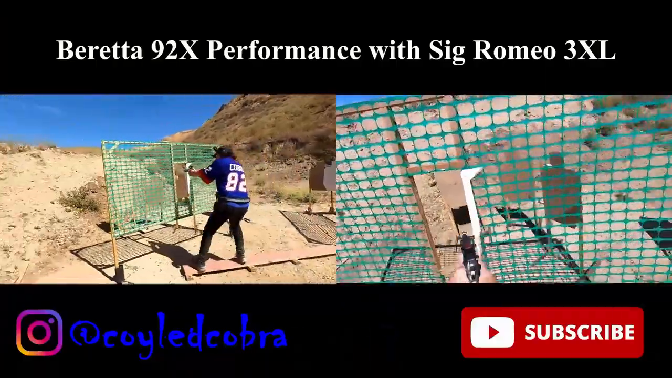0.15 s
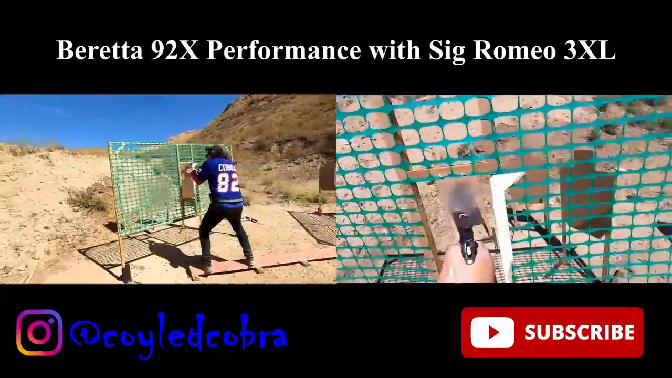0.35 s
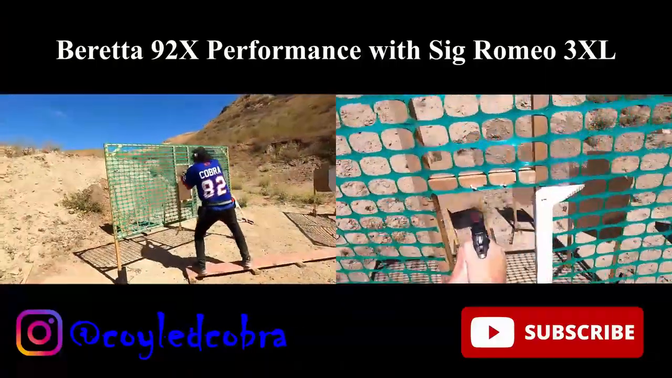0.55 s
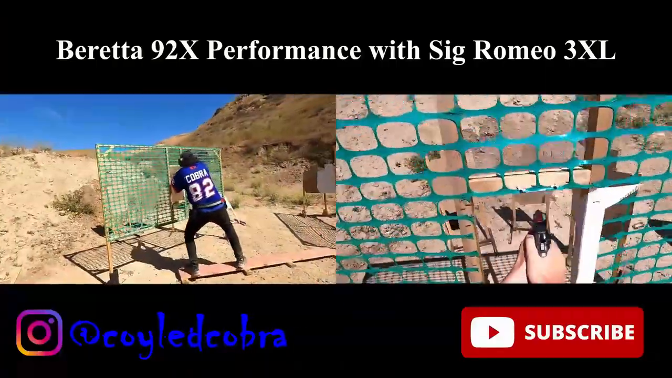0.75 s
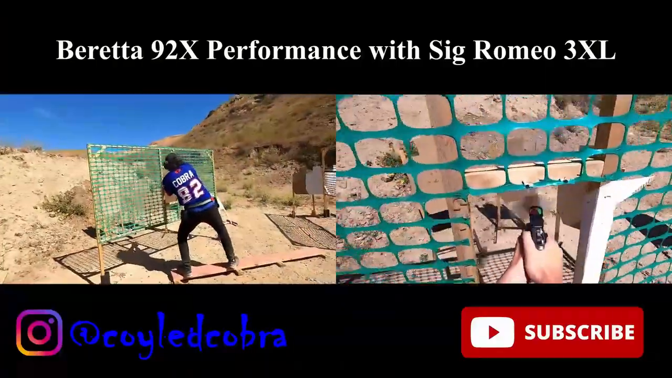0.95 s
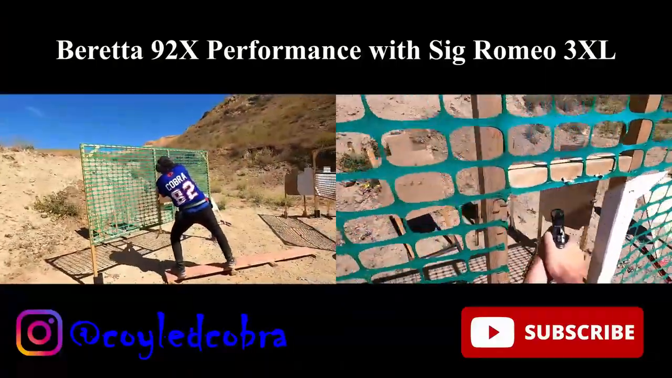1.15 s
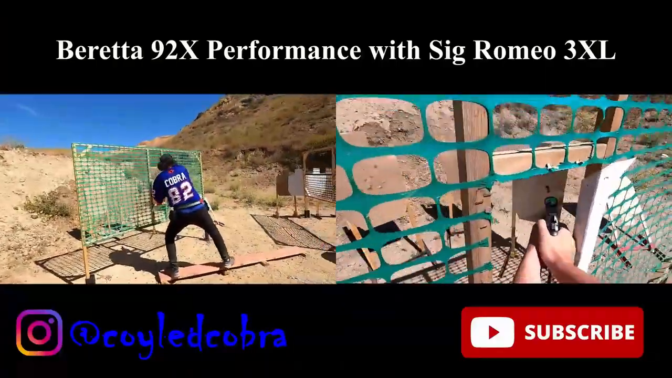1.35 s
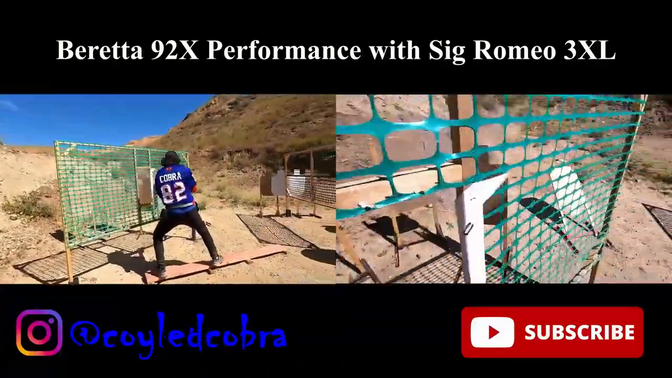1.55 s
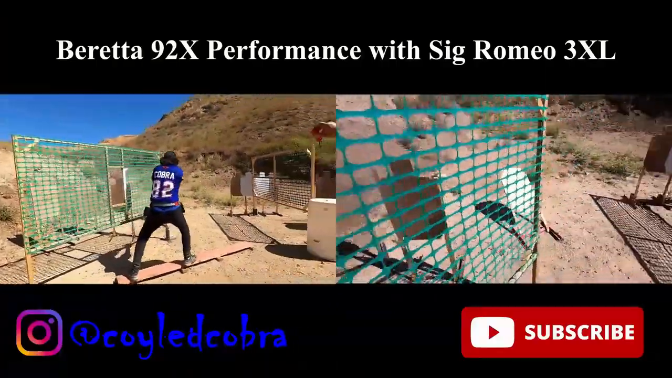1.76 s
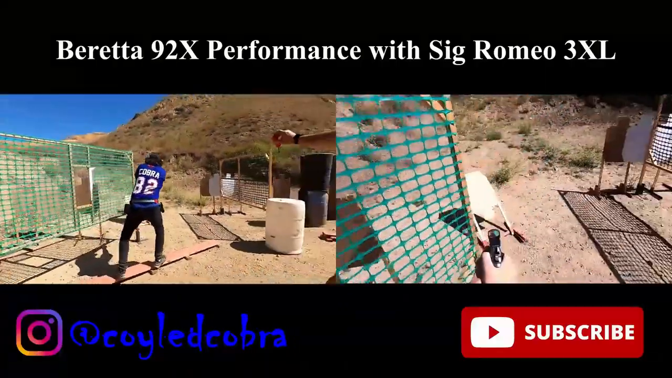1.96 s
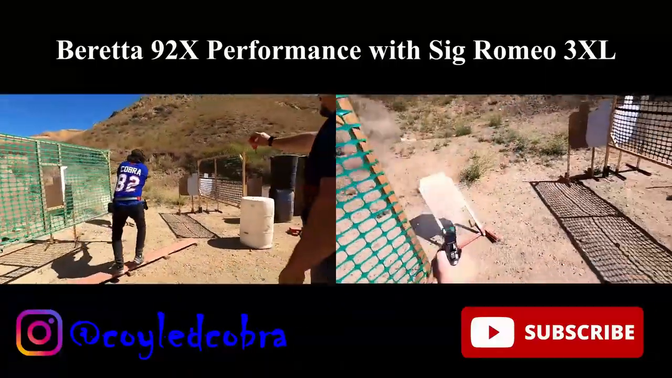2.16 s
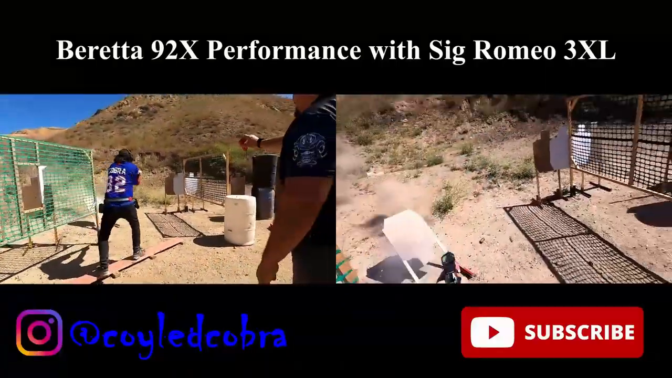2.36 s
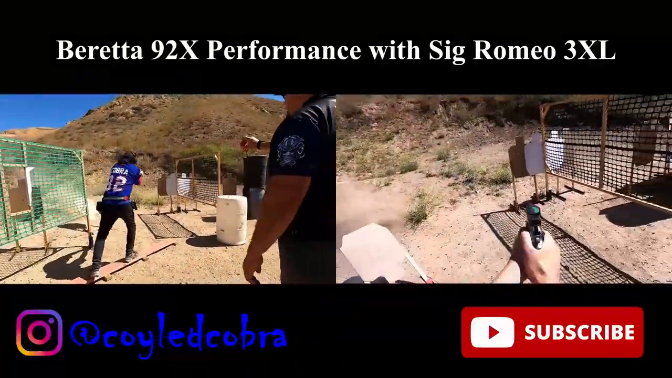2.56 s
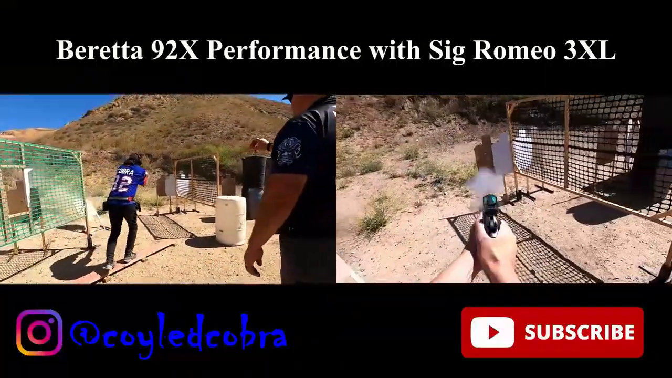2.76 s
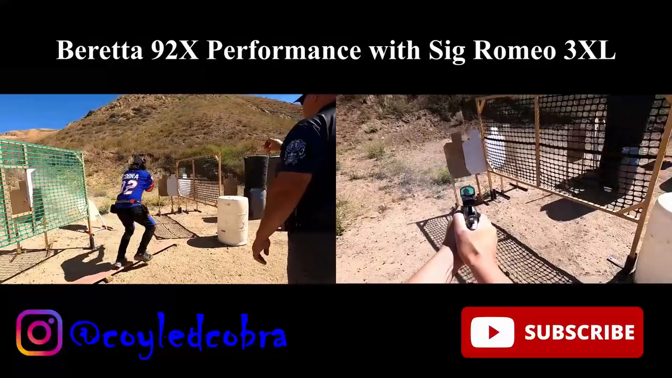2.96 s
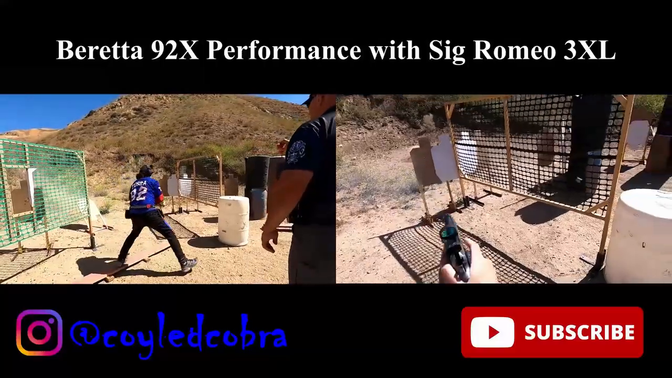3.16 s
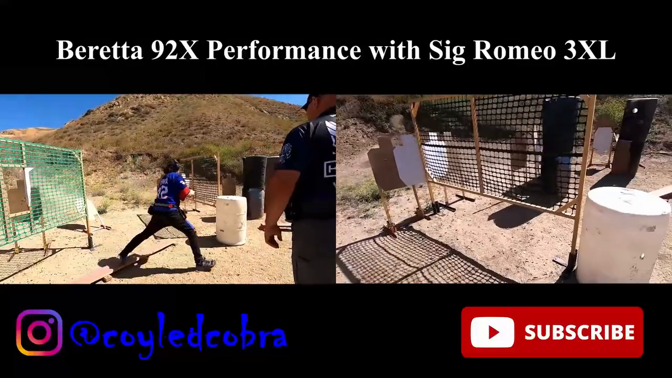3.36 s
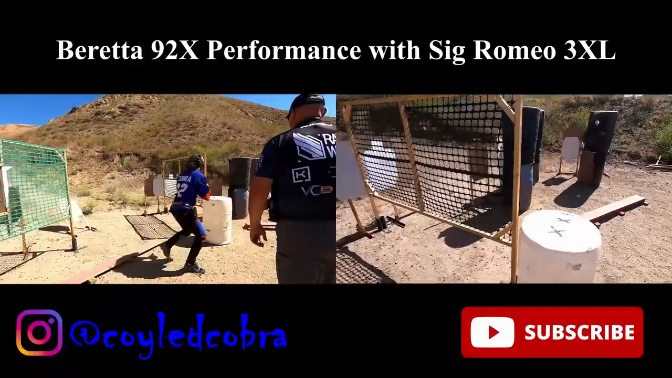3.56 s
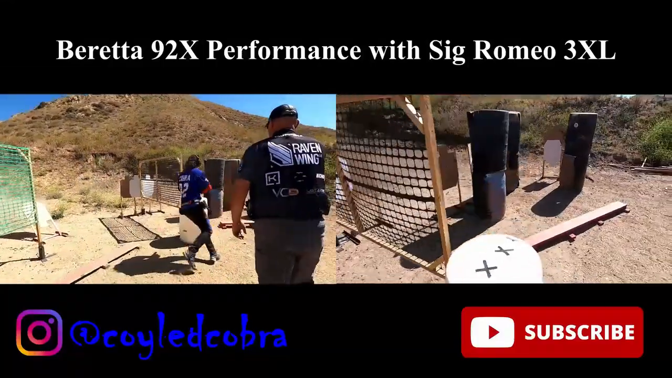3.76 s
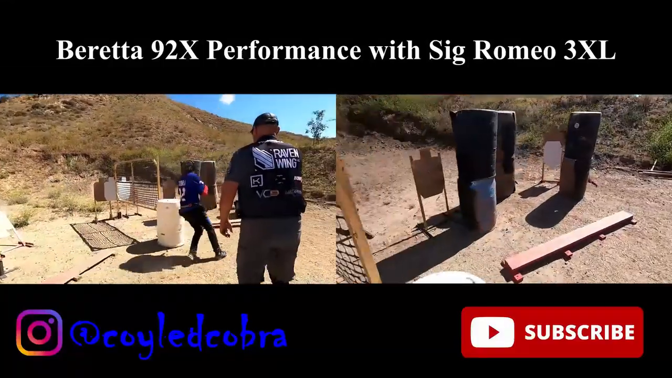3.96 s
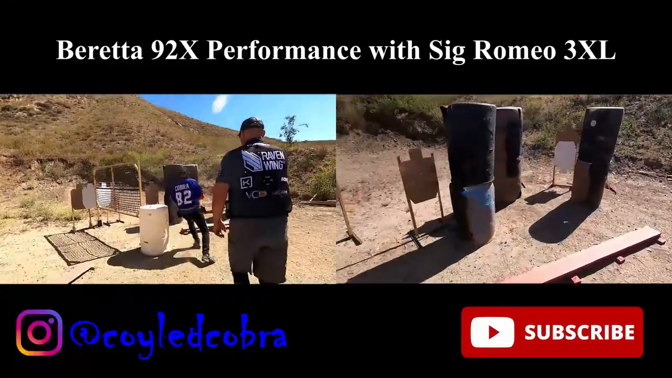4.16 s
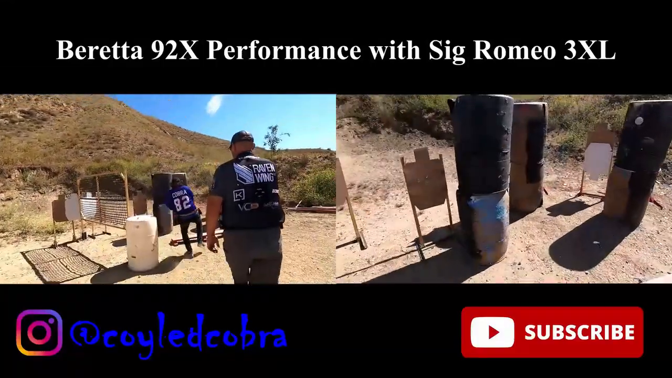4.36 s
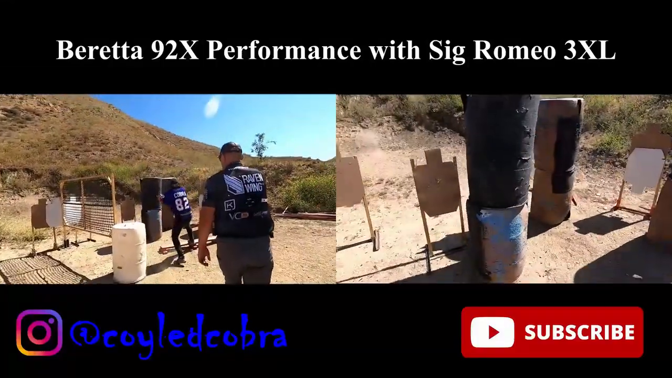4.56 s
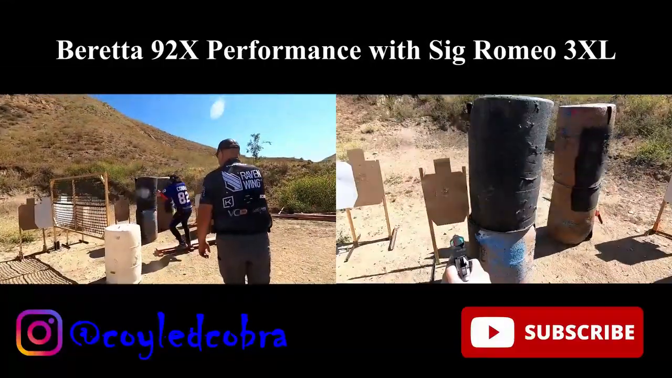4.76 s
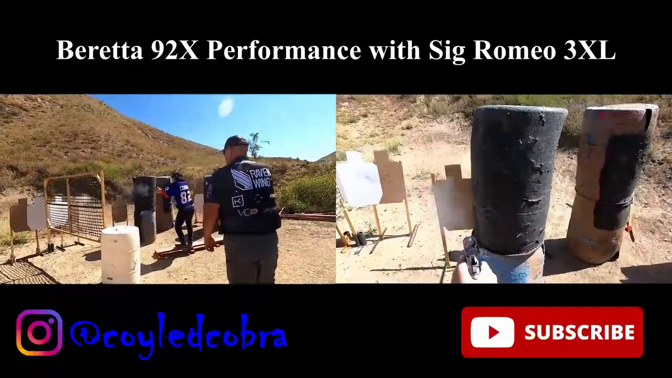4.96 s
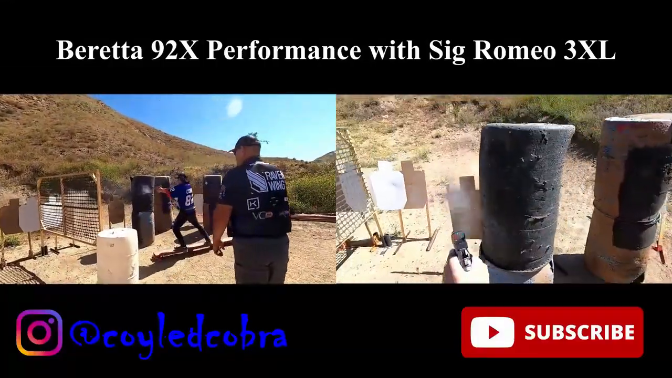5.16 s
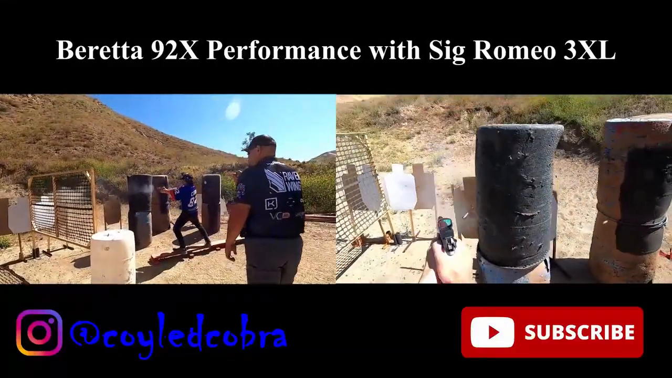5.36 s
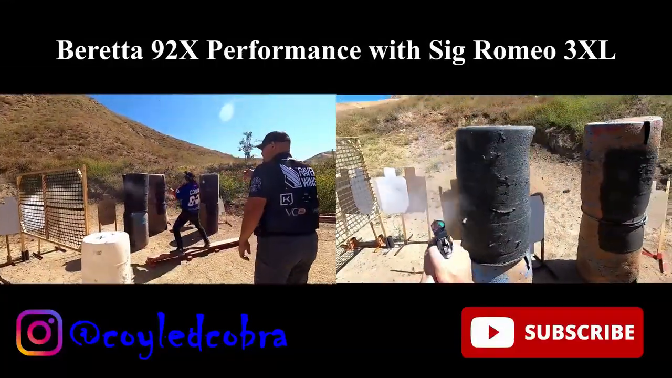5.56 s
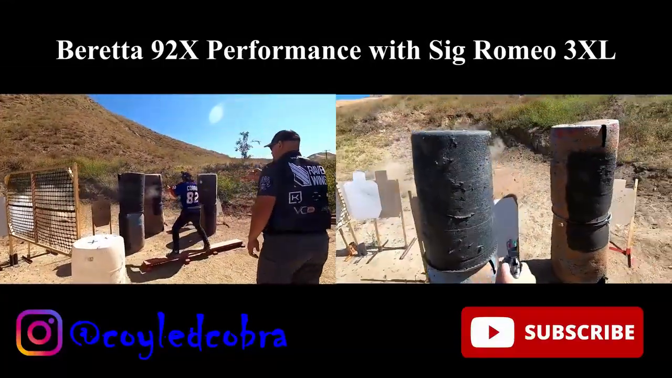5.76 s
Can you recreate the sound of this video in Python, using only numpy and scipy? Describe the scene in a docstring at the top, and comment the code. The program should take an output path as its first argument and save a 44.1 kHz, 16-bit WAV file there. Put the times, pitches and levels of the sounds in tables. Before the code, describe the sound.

A close, mono outdoor take on a gravel range with earth banks. A bright hiss and low wind buffet fade within the first quarter second, with small thuds and a gritty crunch underfoot. From 0.3 to 1.4 s a pistol fires six hard shots about 0.2 s apart, each a saturated crack with low thump, ground bounce, dull bank slaps and a lumpy hillside answer returning around 0.4 s later. A foot knocks at 1.8 s. Two shots follow at 2.05 and 2.2 s, with a harder panel slap, then two at 2.7 and 2.95 s. From 3.3 to 4.7 s the shooter moves: boots thud, scuff and grind stones, tiny high brass tinkles sound, wind rumbles lightly, and a sharp, heavy knock lands at 4.2 s. The last four shots come at 4.8, 5.0, 5.3 and 5.5 s, their echoes trailing to the end.

```python
"""Pistol strings in an earth bay

A pistol fires quick strings of shots outdoors: each is a pressure jump with wall scatter, ground bounce, berm echoes
and a hillside answer of lumpy, dying noise. Boots thud and scuff on gravel (short rings, coloured grains), spent cases
tinkle (paired sines), wind buffets (low noise) and an opening hiss dies away, at a mono microphone that saturates."""
import sys
import numpy as np
from scipy import signal
from scipy.fft import rfft, irfft, next_fast_len
from scipy.io import wavfile
from scipy.ndimage import map_coordinates

SR = 44100
rng = np.random.default_rng(int(sys.argv[2]) if len(sys.argv) > 2 else 0)


def int16_out(signal):
    """Quantize to a 16-bit WAV file."""
    q = np.round(np.clip(np.atleast_2d(signal).T, -1, 1) * 32767)
    wavfile.write(sys.argv[1], SR, q.astype(np.int16))


N = 255912
EVENT_T = np.arange(SR // 5) / SR  # time within one short sound [s]

# dull colour of shifting stones: (frequency [Hz], level [dB])
SHUFFLE_COLOUR = [(88, -32), (150, 2), (264, -2.5), (318, -2), (545, -0.5), (835, -0.5), (923, -1),
                  (3000, -22.5), (3900, -46), (6600, -120)]
# bright colour of gritty grains: (frequency [Hz], level [dB])
GRIT_COLOUR = [(500, -19), (1500, 0.5), (2500, -1.5), (4400, -7), (7800, -23), (10000, -18.5), (11200, -29),
               (14000, -30)]


def amp(db):
    """Gain of a level in dB."""
    return 10 ** (np.asarray(db) / 20)


def unit(x):
    """x at rms 1."""
    return x / np.sqrt(np.mean(x ** 2) + 1e-20)


def along(points, hz):
    """Read (frequency, value) points on a log frequency axis."""
    f, v = np.transpose(points)
    return np.interp(np.log(hz + 1), np.log(f + 1), v)


def curves(rows):
    """One value per sample for each column after the time."""
    s, *columns = np.transpose(rows)
    return [np.interp(np.arange(N) / SR, s, column) for column in columns]


def wobble(rate):
    """A smooth random curve with rate knots a second."""
    knots = rng.standard_normal(int(N * rate / SR) + 4)
    return map_coordinates(knots, [np.arange(N) * rate / SR])


def coloured(x, spectrum):
    """x through a spectrum, at rms 1."""
    m = next_fast_len(len(x) + 4096)
    gain = amp(along(spectrum, np.fft.rfftfreq(m, 1 / SR)))
    return unit(irfft(rfft(x, m) * gain, m)[:len(x)])


def dying(spectrum, t60s, size, lumpy_db):
    """Lumpy noise that starts at once, each octave band dying at its own speed."""
    centres = 40 * 2. ** np.arange(10)  # [Hz]
    t = np.arange(size) / SR
    steps = np.repeat(rng.standard_normal(size // 40 + 1), 40)[:size]  # a new level every 40 samples
    lumps = amp(lumpy_db * steps)
    z = rfft(coloured(lumps * rng.standard_normal(size), spectrum))
    # neighbouring bands crossfade over an octave; the lowest takes all below it
    octave = np.log2(np.fft.rfftfreq(size, 1 / SR) + 1)
    octave = np.clip(octave, np.log2(centres[0]), 99)
    share = np.clip(1 - abs(octave - np.log2(centres)[:, None]), 0, 1)
    decay = amp(-60 * t / along(t60s, centres)[:, None])
    return np.sum(irfft(z * share, size) * decay, axis=0)


def soft(x, top_hz):
    """x without its treble."""
    return signal.lfilter(*signal.butter(2, min(top_hz, 20000), fs=SR), x)


def add(track, s, sound):
    """Mix a sound into the track at time s."""
    track[round(s * SR):][:len(sound)] += sound


def blast(t, push_s):
    """A pressure jump and the suction after it, as muzzle gas makes."""
    u = t / push_s
    return (1 - u) * np.exp(-u)


def hiss():
    """Bright noise holds briefly as the scene opens, then dies away exponentially."""
    # colour of the opening hiss: (frequency [Hz], level [dB])
    hiss_colour = [(1000, -2), (3000, 0.5), (6500, 4), (10000, -7.5), (15000, -29)]
    level_db, hold_s, t60_s = -43, 0.014, 0.26
    late = np.clip(np.arange(N) / SR - hold_s, 0, 1)
    return amp(level_db - 60 * late / t60_s) * coloured(rng.standard_normal(N), hiss_colour)


def wind():
    """Wind at the microphone: low noise in lumpy buffets."""
    # strength of the wind: (time [s], buffet level [dB])
    wind_levels = [(0, -24.5), (.08, -31.5), (.14, -40), (.24, -37), (.68, -53.5), (1.55, -63.5),
                   (1.8, -79), (1.83, -52), (1.92, -59), (2.45, -45.5), (2.6, -49), (3.2, -54.5),
                   (3.35, -45.5), (3.62, -50.5), (3.76, -62), (3.93, -50), (4.17, -61.5), (4.22, -43.5),
                   (4.3, -52.5), (4.6, -46), (4.75, -51.5), (5.2, -64), (5.7, -62)]
    # colour of the buffets: (frequency [Hz], level [dB])
    buffet_colour = [(12, -25), (20, 3.5), (102, 2.5), (201, -19), (296, -15), (400, -47.5), (520, -36),
                     (880, -120)]
    buffet_db, = curves(wind_levels)
    lumps = amp(3 * wobble(22))
    return amp(buffet_db) * unit(lumps * coloured(rng.standard_normal(N), buffet_colour))


def gravel():
    """Boots shift the stones: a dull shuffle with gritty grains on top, stirred together."""
    # stir of the stones: (time [s], shuffle level [dB], grit level [dB])
    gravel_levels = [(0, -56, -47.5), (.1, -58.5, -58.5), (.26, -45.5, -49.5), (1.6, -53, -59.5),
                     (1.8, -55.5, -69), (1.83, -48, -63.5), (2, -57.5, -65.5), (2.45, -52.5, -57.5),
                     (2.65, -51.5, -64), (3.18, -55.5, -62), (3.33, -44, -60.5), (3.5, -53, -57),
                     (3.64, -51, -57.5), (3.82, -59, -64.5), (4.205, -54.5, -58.5), (4.216, -42, -60),
                     (4.38, -48, -55.5), (4.53, -42, -52), (4.66, -50.5, -51.5), (4.73, -42.5, -54),
                     (5.7, -51.5, -61)]
    shuffle_db, grit_db = curves(gravel_levels)
    stir = wobble(25.165)
    grains = rng.standard_normal(N) * amp(4 * rng.standard_normal(N))
    dull_swing = amp(0.4 * stir + 3.25 * wobble(63))
    dull = unit(dull_swing * coloured(rng.standard_normal(N), SHUFFLE_COLOUR))
    bright = unit(amp(3.2 * stir) * coloured(grains, GRIT_COLOUR))
    return amp(shuffle_db) * dull + amp(grit_db) * bright


def scuffs():
    """A burst of grit that swells and fades under a dragging sole."""
    # dragging soles: (time [s], grit level [dB], length [s])
    scuff_events = [(3.367, -55.5, 0.042), (3.598, -59.5, 0.073), (3.7254, -62.5, 0.11),
                    (3.85, -54.5, 0.11), (3.956, -55, 0.064), (4.036, -55, 0.041), (4.089, -53.5, 0.056),
                    (4.135, -52.5, 0.065), (4.313, -43.5, 0.069), (4.482, -55, 0.032), (4.5294, -61, 0.05),
                    (4.599, -57, 0.033), (4.706, -51.5, 0.054)]
    dull_db = 5.5  # dull part over the grit
    lean = 0.38  # below 1 the stroke peaks early
    out = np.zeros(N + SR)
    for s, db, length in scuff_events:
        grains = rng.standard_normal((2, len(EVENT_T))) * amp(5 * rng.standard_normal(len(EVENT_T)))
        stroke = np.sin(np.pi * np.clip(EVENT_T / length, 0, 1) ** lean) ** 2
        bright = coloured(grains[0], GRIT_COLOUR)
        dull = amp(dull_db) * coloured(grains[1], SHUFFLE_COLOUR)
        add(out, s, amp(db) * stroke * (bright + dull))
    return out[:N]


def knocks():
    """Footfalls and knocks: a short two-mode ring with a crunch and a hard gritty snap."""
    # footfalls and knocks: (time [s], ring level [dB], pitch [Hz], ring t60 [s],
    # crunch level [dB], snap level [dB], grit level [dB])
    knock_events = [(0.158, -34, 108.3, 0.043, -43, -60, -66), (0.238, -38, 119, 0.055, -38, -45, -26),
                    (1.823, -41, 87.6, 0.072, -46, -36, -60), (1.848, -46.5, 462, 0.04, -36, -48, -51),
                    (2.434, -39, 61.9, 0.047, -45, -50, -56), (3.309, -37, 302, 0.15, -50, -55, -64),
                    (3.859, -47, 279, 0.21, -54, -50, -51), (3.929, -27, 275, 0.083, -40, -45, -62),
                    (4.018, -42, 380, 0.026, -27.5, -40, -48), (4.085, -39, 160, 0.097, -57, -50, -50),
                    (4.2159, -22, 494, 0.019, -32, -23, -48), (4.238, -39, 472, 0.06, -33, -34, -44),
                    (4.41, -29.5, 61.9, 0.039, -42, -55, -58)]
    overtone, overtone_db = 1.45, -10  # second mode: pitch ratio and level over the first
    attack_s = 0.0019
    snap_s, snap_hz = 0.0005, 1800  # first hard contact: push time and treble limit
    out, t = np.zeros(N + SR), EVENT_T
    for s, db, hz, t60, crunch_db, snap_db, grit_db in knock_events:
        modes = np.sin(2 * np.pi * hz * t) + amp(overtone_db) * np.sin(2 * np.pi * overtone * hz * t)
        ring = amp(db - 60 * t / t60) * modes
        grit = dying(GRIT_COLOUR, [(1000, 0.4 * t60)], len(t), lumpy_db=3)
        crunch = dying(SHUFFLE_COLOUR, [(1000, 0.5 * t60)], len(t), lumpy_db=3)
        snap = soft(soft(blast(t, snap_s), snap_hz), snap_hz)
        body = (ring + amp(crunch_db) * crunch) * (1 - np.exp(-t / attack_s))
        add(out, s, body + amp(snap_db) * snap + amp(grit_db) * soft(grit, 5000))
    return out[:N]


def cases():
    """Spent brass rings in a close pair of modes, dying exponentially."""
    # tinkles: (time [s], level [dB], pitch [Hz], t60 [s])
    case_events = [(3.3817, -54, 10080, 0.091), (3.5882, -50, 10140, 0.048), (4.2283, -63, 9810, 0.06),
                   (4.3011, -53, 10200, 0.055), (4.5794, -59, 9820, 0.071)]
    out, t = np.zeros(N + SR), EVENT_T
    for s, db, hz, t60 in case_events:
        pair = np.sin(2 * np.pi * hz * t) + 0.5 * np.sin(2 * np.pi * 1.03 * hz * t)
        add(out, s, amp(db - 60 * t / t60) * pair * (1 - np.exp(-t / 0.0034)))
    return out[:N]


def hillside(level_db):
    """The hill answers with lumpy noise: ledges slap back the low part, scrub diffuses the rest."""
    # colour of the answer: (frequency [Hz], level [dB])
    slope_colour = [(24, -49.5), (40, -8.5), (169, -3), (239, -5.5), (443, -7), (933, -6.5), (1610, -14),
                    (2110, -17), (4680, -19.5), (8480, -33.5), (15000, -41)]
    # decay of the answer: (frequency [Hz], t60 [s])
    slope_t60 = [(100, 0.48), (700, 1), (3000, 0.7), (9000, 0.47)]
    # level of the hill's answer, which drops sharply by 0.23 s, then returns as a second answer
    # around 0.4 s: (time after the shot [s], level [dB])
    slope_shape = [(0, 6), (.04, -13), (.06, -11.5), (.12, -10), (.19, -11.5), (.23, -34), (.4, -2.5),
                   (.6, -27.5)]
    t = np.arange(SR * 3 // 5) / SR
    shape_db = np.interp(t, *np.transpose(slope_shape))
    ledges_db = 3 * map_coordinates(rng.standard_normal(80), [t * 120])  # 120 knots a second
    answer = dying(slope_colour, slope_t60, len(t), lumpy_db=1.5)
    low = soft(answer, 1200)
    return amp(level_db + shape_db) * (answer + (amp(ledges_db) - 1) * low)


def berm_echo(level_db):
    """An earth berm returns a dulled slap and a short scatter that builds up softly."""
    # colour of the scatter: (frequency [Hz], level [dB])
    berm_colour = [(35, -21.5), (60, 1.5), (563, 2), (1140, -10.5), (2200, -26), (4300, -22), (8800, -41),
                   (15600, -84), (22000, -120)]
    scatter = dying(berm_colour, [(100, 0.08), (5000, 0.03)], len(EVENT_T), lumpy_db=3)
    slap = 0.35 * soft(blast(EVENT_T, 0.0013), 1400)
    return amp(level_db) * (slap + scatter * (1 - np.exp(-EVENT_T / 0.002)))


def panel_echo(level_db):
    """A hard panel returns one short blast with its treble softened twice."""
    return amp(level_db) * soft(soft(blast(EVENT_T, 0.0001), 4500), 4500)


def swell(level_db, rise_s):
    """A short hiss swells steeply from silence and ends where the shot begins."""
    # colour of the swelling hiss: (frequency [Hz], level [dB])
    swell_colour = [(100, -9), (400, -3.5), (1400, -1), (2300, -8.5), (3300, -3.5), (5400, -12.5),
                    (10000, -16.5), (15600, -30)]
    fall = np.cos(np.pi / 2 * np.clip(EVENT_T / rise_s, 0, 1)) ** 3
    noise = coloured(rng.standard_normal(len(EVENT_T)), swell_colour)
    return amp(level_db) * (fall * noise)[::-1]


def gas_cloud(level_db):
    """The slow suction and rebound of the gas cloud: a dying low sine that starts downward."""
    t = EVENT_T
    return -amp(level_db - 60 * t / 0.047) * np.sin(2 * np.pi * 64 * t) * (1 - np.exp(-t / 0.013))


def blast_colour(treble_db):
    """The colour of one scattered blast, varied at random so that no two are alike."""
    # scattered blast: (frequency [Hz], level [dB])
    crack_colour = [(59, -14), (100, -12), (629, -5), (1530, -13), (1930, -21.5), (3400, -11.5),
                    (5000, -24.5), (7770, -25), (8450, -26.5), (12400, -45.5), (15600, -67.5)]
    colour = crack_colour + rng.normal(0, 2.5, (len(crack_colour), 1)) * [0, 1]
    colour[:, 1] += treble_db * (colour[:, 0] > 1700)
    return colour


def blast_scatter(colour, t60):
    """Rough surfaces scatter the blast into lumpy noise, each band dying at its own speed."""
    # decay of the bands: (frequency [Hz], share of the scatter t60 [ratio])
    crack_life = [(150, 2.6), (800, 0.84), (3000, 0.87), (10000, 0.69)]
    return dying(colour, np.multiply(crack_life, [1, t60]), len(EVENT_T), lumpy_db=3.0)


def shots():
    """Each blast arrives direct, off ground, walls, posts and panels, off both berms and the hill."""
    # shots: (time [s], blast level [dB], thump over the blast [dB], swell over the blast [dB], swell rise [s])
    shot_events = [(0.3128, -0.5, 1, -16, 0.054), (0.5163, -4, -2, -19, 0.029),
                   (0.7384, -4.5, -2, -22, 0.038), (.917, -5.5, 7, -19.5, 0.026),
                   (1.1696, -4.5, 6.5, -24.5, 0.036), (1.3676, -6, 9.5, -18.5, 0.032),
                   (2.0516, -2.5, 2.5, -23, 0.039), (2.216, -7, 6, -17, 0.03),
                   (2.7184, -4, -1.5, -17, 0.035), (2.9392, -6, -11, -18, 0.034),
                   (4.8327, -0.5, -2, -17.5, 0.046), (5.0174, -1, -6, -31, 0.03),
                   (5.28, -5, -10, -22, 0.034), (5.4713, -5, 3.5, -21.5, 0.031)]
    # each aim faces other walls: (from time [s], ground bounce delay [s], wall scatter t60 [s],
    # treble of the scatter [dB], panel [dB], near berm [dB], far berm [dB], hillside [dB])
    aims = [(0, 0.008, 0.089, -0.2, -30, -22, -26.5, -23.5),
            (.65, 0.0074, 0.05, -0.1, -27, -25, -29.5, -21.5),
            (1.8, 0.01, 0.095, -1.5, -11, -31.5, -26, -18.5),
            (2.5, 0.0091, 0.14, 0.8, -24, -23, -25, -17.5), (4, .011, 0.085, -2.5, -30.5, -19, -26.5, -20),
            (5.2, .011, 0.061, -0.4, -26, -23, -36, -19.5)]
    # round trips to the two berms: (near [s], far [s])
    berm_delays = (.0615, .093)
    panel_s = 0.0335  # round trip to the hard panel
    out, t = np.zeros(N + SR), EVENT_T
    for s, db, thump_db, swell_db, rise_s in shot_events:
        aim = [row[1:] for row in aims if row[0] <= s][-1]
        ground_s, wall_t60, treble_db, panel_db, near_db, far_db, hill_db = aim
        add(out, s - len(t) / SR, swell(db + swell_db, rise_s))
        colour = blast_colour(treble_db)
        direct = 0.5 * soft(blast(t, 0.00013), 13000)
        scatter = 0.65 * blast_scatter(colour, 0.03) + 0.32 * blast_scatter(colour, wall_t60)
        add(out, s, amp(db) * (direct + scatter))
        bounce = soft(1.05 * blast(t, 0.00031) + 0.23 * blast_scatter(colour, 0.032), 3600)
        add(out, s + ground_s, amp(db) * bounce)
        # posts and panels close by return small copies of either sign
        for late, size in rng.uniform([0.001, -1], [0.012, 1], (5, 2)):
            add(out, s + late, amp(db) * 0.65 * size * soft(blast(t, 0.00032), 4400))
        add(out, s + 0.0015, gas_cloud(db + thump_db))
        add(out, s + panel_s, panel_echo(panel_db))
        for delay, echo_db in zip(berm_delays, (near_db, far_db)):
            add(out, s + delay, berm_echo(echo_db))
        add(out, s, hillside(hill_db))
    return out[:N]


def scene():
    """One microphone feeds both channels."""
    mono = hiss() + wind() + gravel() + scuffs() + knocks() + cases() + shots()
    return np.tile(mono, (2, 1))


def record(dry):
    """The input saturates on the blasts, dulls the treble and keeps nothing above its band limit."""
    ceiling, top_hz = 0.76, 15760
    held = dry / (1 + abs(dry / ceiling) ** 5) ** (1 / 5)
    m = next_fast_len(N + 4096)
    hz = np.fft.rfftfreq(m, 1 / SR)
    response = (hz < top_hz) / (1 + (hz / 12000) ** 4)
    return irfft(rfft(held, m) * response, m)[:, :N]


dry = scene()
out = record(dry)
int16_out(out)
```